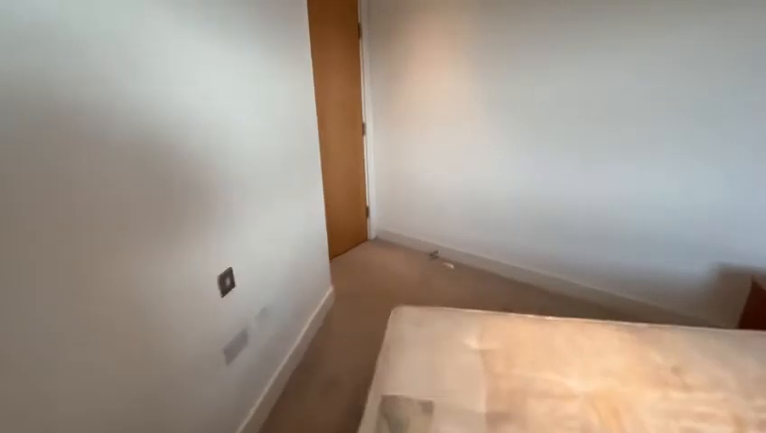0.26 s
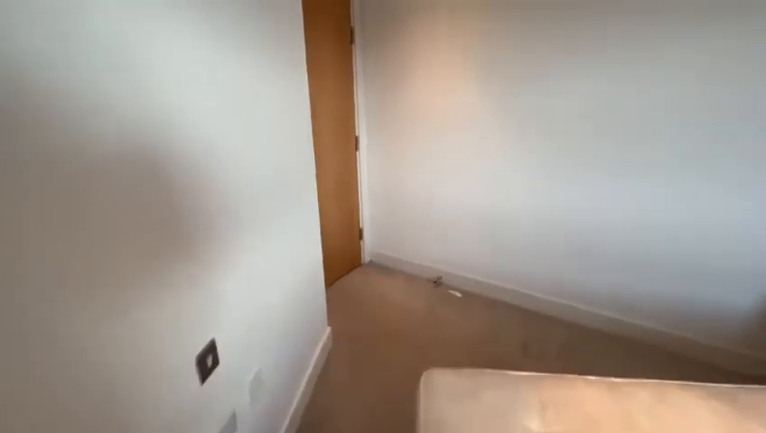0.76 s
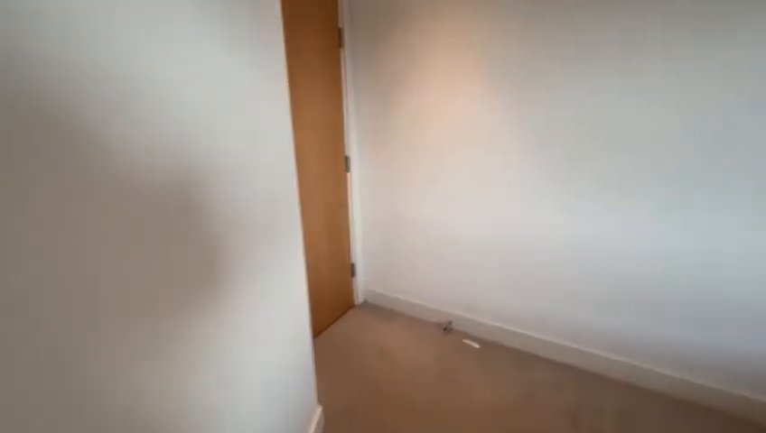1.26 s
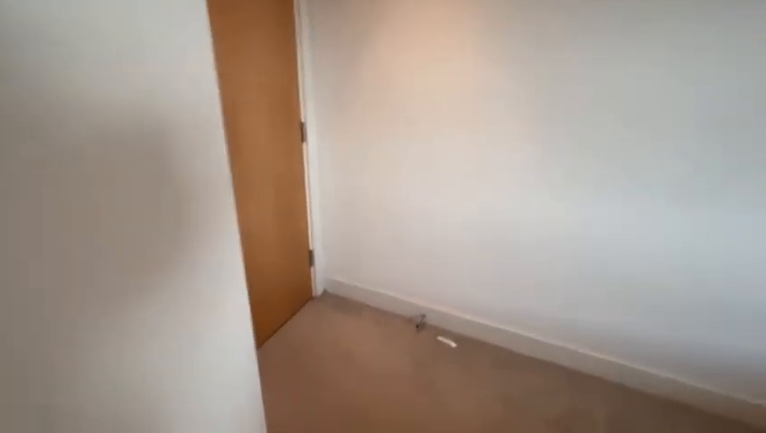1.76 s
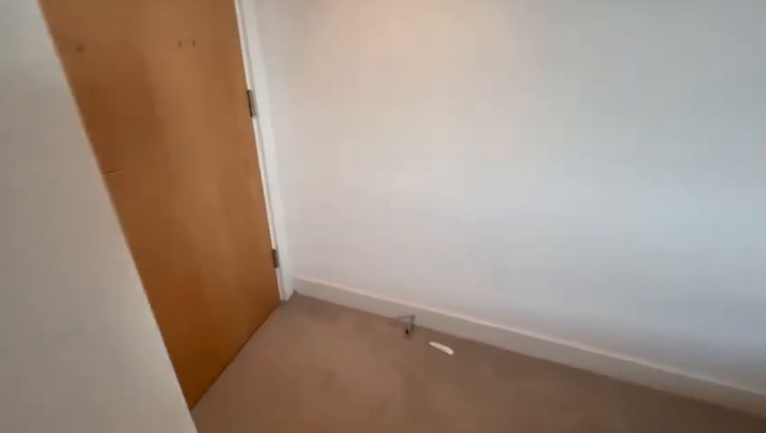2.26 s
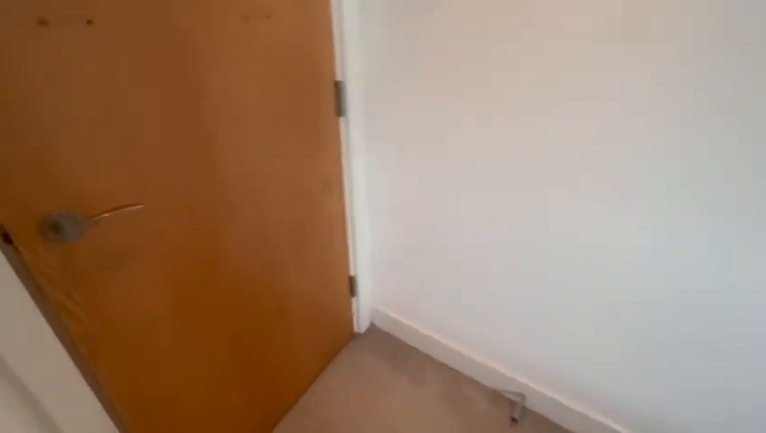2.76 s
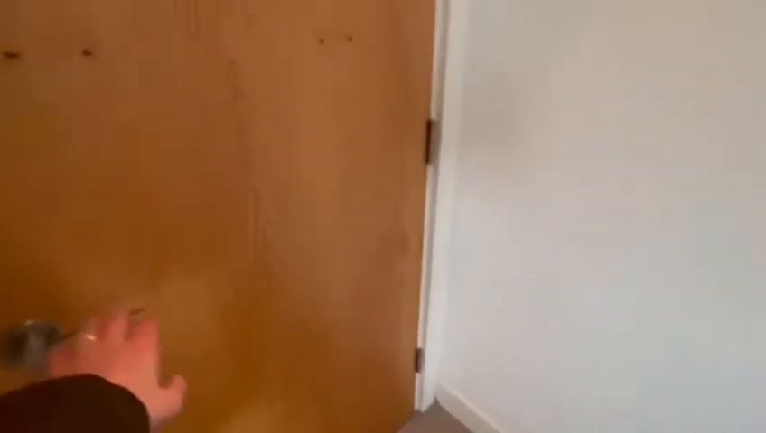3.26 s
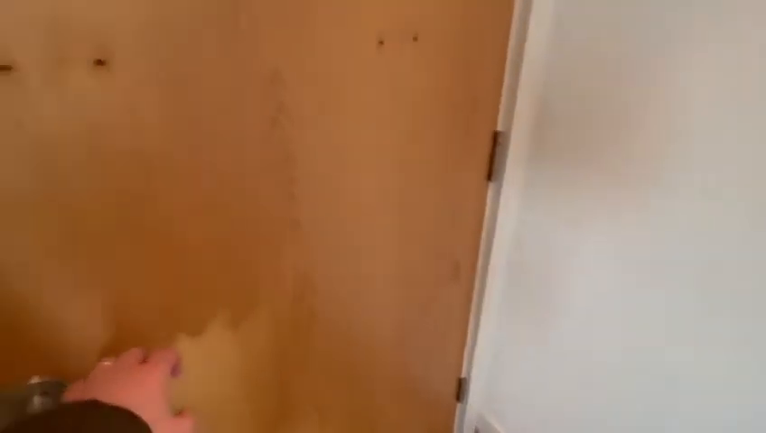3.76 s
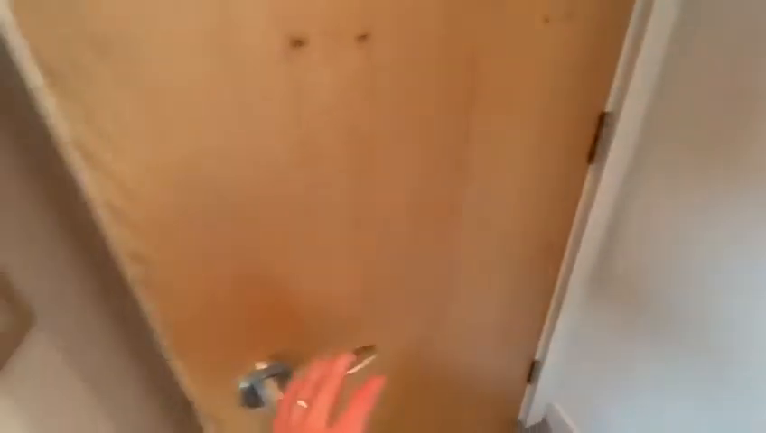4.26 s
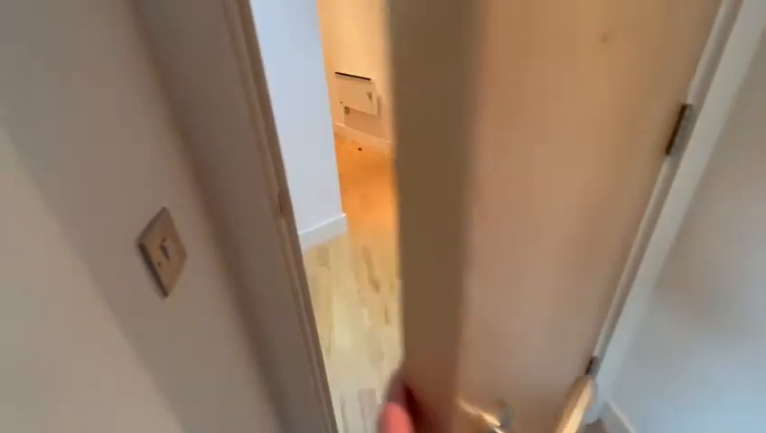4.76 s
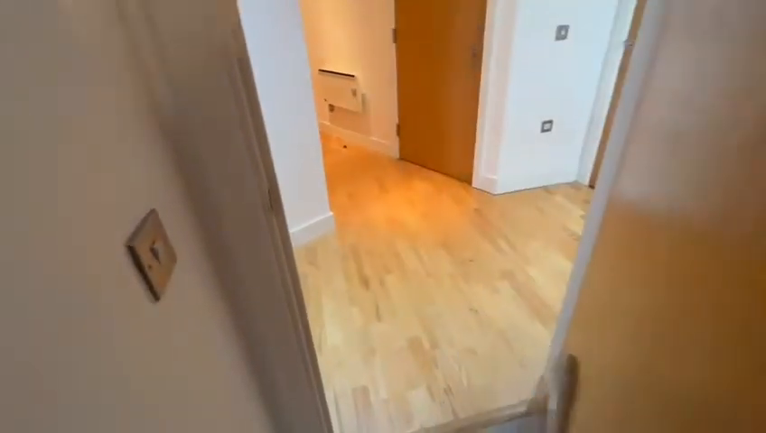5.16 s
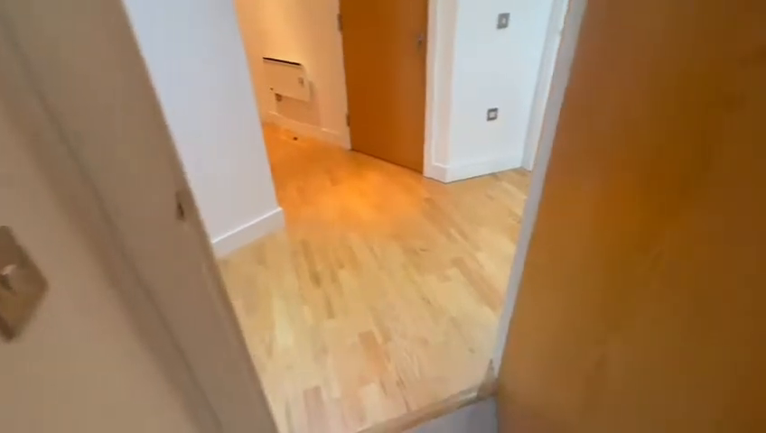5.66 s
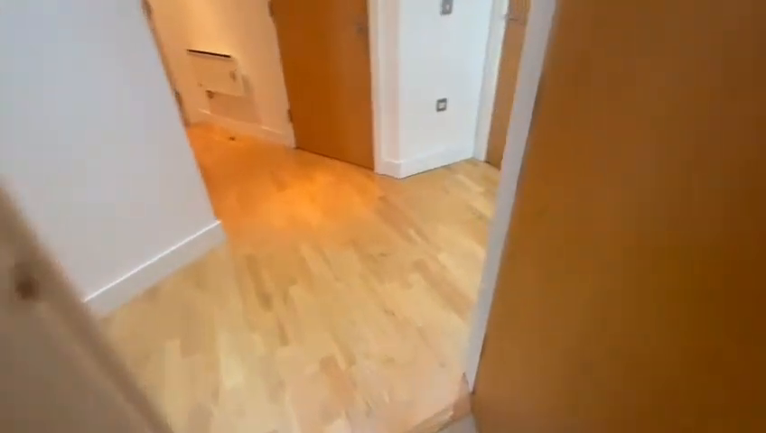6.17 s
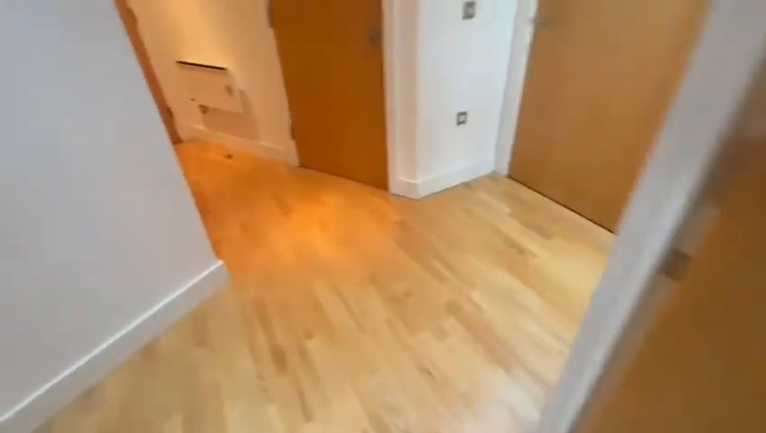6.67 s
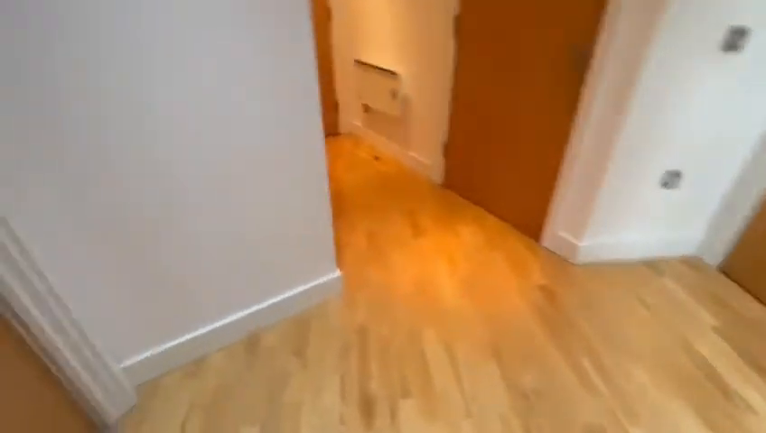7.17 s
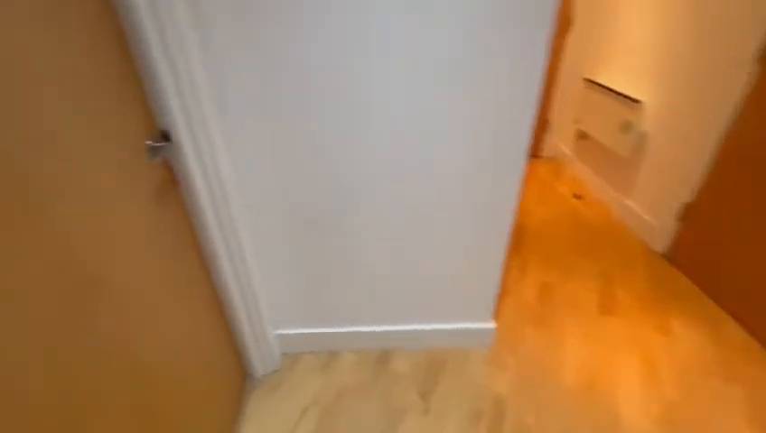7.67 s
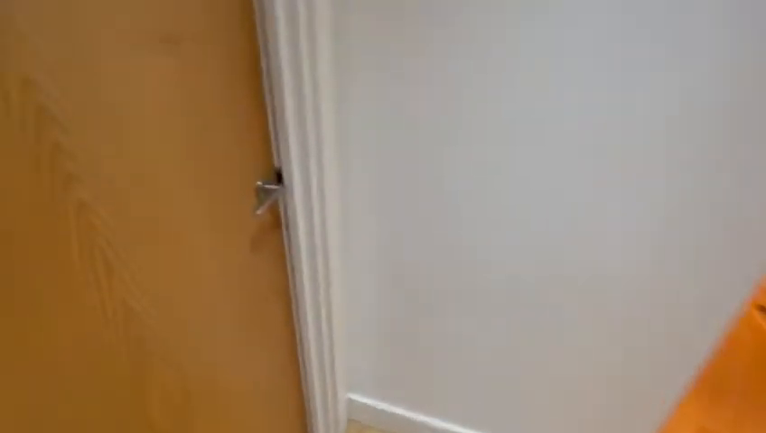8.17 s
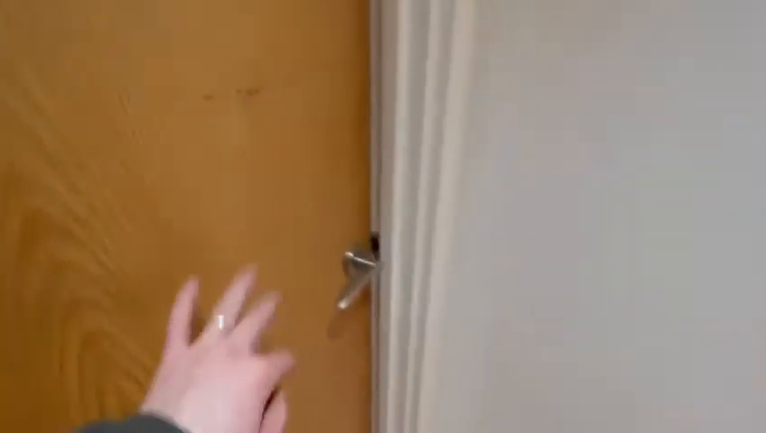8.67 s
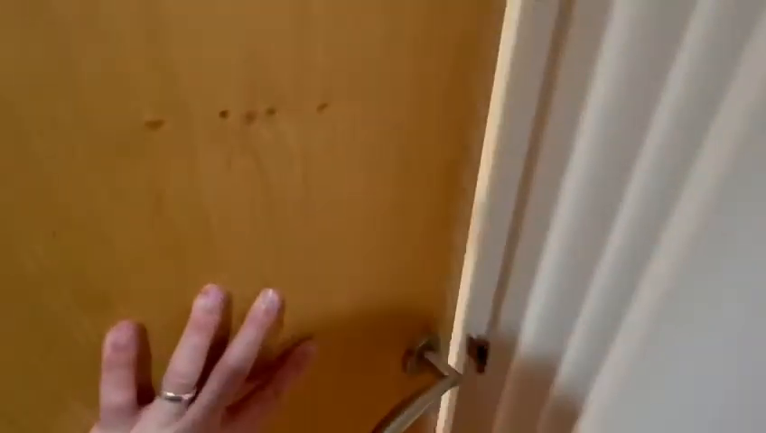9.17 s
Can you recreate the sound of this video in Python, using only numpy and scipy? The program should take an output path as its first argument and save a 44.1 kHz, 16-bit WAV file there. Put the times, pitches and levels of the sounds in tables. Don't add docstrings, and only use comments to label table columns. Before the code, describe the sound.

Close mono handheld phone sound: cloth rubbing, fingertip taps and grip rumble throughout. A crisp scuff on a bedroom carpet edge is followed by small metallic ticks, a sleeve swish and faint handle clicks. After a soft tug and rustling, a hollow door thump bounces against its stop. In the barer, livelier hall, shoes scrape in two drags, then a palm pats wood and a lever and latch snap open.

```python
import sys
import numpy as np
from scipy import signal
from scipy.fft import rfft, irfft, next_fast_len
from scipy.io import wavfile
from scipy.ndimage import uniform_filter1d, map_coordinates

SR = 44100
rng = np.random.default_rng(int(sys.argv[2]) if len(sys.argv) > 2 else 0)


def boost(x):
    u = np.asarray(x, float) / 20
    return 10 ** u


def bounce(signal):
    frames = np.transpose(np.atleast_2d(signal))
    limited = np.clip(frames, -1, 1)
    pcm = np.round(limited * 32767).astype(np.int16)
    wavfile.write(sys.argv[1], SR, pcm)


N = 415422

# time in seconds, level in dB.
SCUFF_PRESSURE = [
    [(1.0, -67), (1.022, -44), (1.044, -31), (1.053, -35), (1.058, -25.5), (1.085, -29.5), (1.14, -58)],
    [(7.1, -57), (7.148, -48.5), (7.186, -40), (7.2, -34), (7.25, -31), (7.262, -26.5), (7.35, -27),
     (7.44, -32), (7.5, -54)],
    [(7.895, -67), (7.913, -41), (7.933, -34), (8.07, -34), (8.09, -29.5), (8.115, -32), (8.285, -33),
     (8.3, -37), (8.345, -33), (8.41, -55)],
]
# frequency in Hz, level in dB per Hz.
SOLE_SPECTRA = [
    [(260, -33), (450, -7.5), (2110, -6), (2420, -13), (4760, -3.5), (9100, -18), (12200, -47),
     (15800, -72), (22000, -120)],
    [(240, -32), (400, -25), (500, -5.5), (679, -5.5), (1000, -5.5), (1600, -3), (2100, -11.5),
     (2280, -11.5), (5460, -15), (9130, -28.5), (12200, -29), (15800, -68), (22000, -120)],
    [(240, -20), (400, -25), (560, -13), (800, -4), (1400, -12), (1650, -9), (2100, -12.5), (3660, -12),
     (8870, -31), (11300, -35.5), (12200, -39), (15800, -75), (22000, -120)],
]
# level against the drag in dB, loading time in seconds.
FLOOR_DRUMMING = [(-7.5, 0.039), (-7, 0.076), (-7.5, 0.056)]
UNLOADED_DB = -16
SOLE_ECHO_DB = [-3, -3.5, -5]
# frequency in Hz, width in Hz, level in dB.
BOARD_MODES = [(145, 35, -13.5), (281.4, 72, 6.5), (321, 108, 4.5), (403, 48, 4.5), (550, 34, -6.5)]
# peak, rise and fall in seconds, level in dB, centre in Hz.
SOLE_TWISTS = [(7.39, .1, 0.1, -33, 1540), (7.4, 0.075, 0.053, -38, 625), (7.97, 0.02, 0.06, -41, 3970),
               (8.26, .09, 0.04, -38, 3500), (8.28, .06, .04, -38.5, 1160), (8.34, 0.028, .025, -45, 3300)]
# peak, rise and fall in seconds, level in dB, centre in Hz.
CUFF_RUBS = [(.185, .04, .04, -53, 1100), (.2, 0.044, 0.038, -49, 4470), (.63, .012, .04, -53, 1100),
             (1.68, 0.054, 0.094, -57, 1480), (1.82, 0.044, .04, -54, 1600),
             (2.53, 0.017, 0.037, -49.5, 1300), (4.465, .025, 0.042, -55, 1500)]
TWIST_WIDTH, CUFF_WIDTH = 0.4, 0.86
# peak, rise and fall in seconds, level in dB, pitch in Hz.
DRAG_HUMS = [(7.225, .03, .03, -39, 1450), (7.27, .02, .03, -36, 500), (7.285, .03, .02, -34, 640),
             (7.32, .04, .03, -37, 1500), (7.33, .03, .03, -36, 1000), (7.375, .04, .05, -35, 1150),
             (7.42, 0.037, 0.037, -37, 1684), (7.44, .04, .04, -39, 600), (7.95, 0.035, .06, -40, 833),
             (7.95, 0.035, .08, -44, 660), (7.95, .03, .03, -42, 1670), (7.97, .03, .07, -41, 2360),
             (8.01, 0.037, 0.028, -37.5, 422), (8.043, .03, .01, -33.5, 300),
             (8.08, 0.064, 0.074, -37.5, 798), (8.09, 0.017, .025, -34.5, 360),
             (8.135, .025, .014, -33.5, 319), (8.14, .05, .05, -39, 620), (8.18, .02, .05, -39, 850),
             (8.2, 0.052, .05, -34, 300), (8.2, .05, .07, -40, 1576), (8.21, .04, 0.066, -41, 1060),
             (8.268, 0.017, 0.01, -34.5, 280), (8.31, .03, .04, -41, 1080), (8.33, .03, .025, -36, 330)]
HUM_STRAYS_HZ = 59
# time in seconds, peak in dB.
DOOR_KNOCKS = [
    (6.193, -20.5),
    (6.203, -17.5),
    (6.219, -18),
    (6.238, -23),
    (6.268, -29.5),
]
# frequency in Hz, level in dB, t60 in seconds.
DOOR_MODES = [(144.5, -1.5, 0.23), (161, 0.5, 0.51), (210, -1.5, 0.19), (264, -2, 0.14), (308, -3, .16),
              (343, 1.5, 0.12), (421, -3.5, 0.12), (522, 4, 0.14), (598, 0, 0.17), (702, -8, .12),
              (770, -10, .14)]
# time in seconds, peak in dB, centre in Hz, t60 in seconds.
TICKS = [(1.403, -48, 1860, .032), (1.556, -47.5, 3880, .05), (1.555, -38, 8500, 0.043),
         (2.251, -43, 874, 0.028), (2.726, -42, 2080, .02), (6.371, -35, 1634, 0.027),
         (6.393, -41, 1500, .03), (6.47, -37.5, 2600, 0.053), (6.486, -39, 1190, 0.03)]
# time in seconds, peak in dB, centre in Hz, t60 in seconds.
METAL_KNOCKS = [(.326, -36.5, 1090, .04), (0.618, -38, 1600, 0.06), (.199, -36, 1200, .015),
                (0.885, -32.5, 3500, .07), (3.701, -36, 1450, .05), (6.194, -24, 1250, .05),
                (0.967, -33.5, 1300, 0.022), (2.713, -47, 900, 0.014), (3.017, -38, 597, 0.027),
                (3.228, -31, 650, .02), (4.287, -38, 900, .04), (3.675, -38.5, 1470, 0.053),
                (8.886, -35, 1500, .03), (8.902, -29, 2500, 0.063), (8.906, -34, 1200, .04)]
# time in seconds, peak in dB, centre in Hz, t60 in seconds.
RASPS = [(0.198, -37, 1800, 0.06), (.32, -35.5, 1700, 0.04), (.333, -35.5, 2000, .02),
         (1.957, -36, 1200, 0.064), (7.191, -33, 3000, .05), (3.73, -41, 1700, 0.076),
         (7.255, -21.5, 2150, 0.056), (8.8, -23.5, 3000, 0.043), (8.813, -29, 3370, 0.14),
         (9.04, -24, 2950, 0.051)]
# time in seconds, peak in dB, centre in Hz, t60 in seconds.
HEELS = [(7.15, -34, 1500, .063), (7.16, -30.5, 9000, .05), (7.916, -33.5, 3000, 0.099)]
# time in seconds, peak in dB, centre in Hz, t60 in seconds.
SNAPS = [(1.044, -21, 7000, 0.022), (1.054, -18.5, 2640, 0.058), (4.273, -38, 990, 0.023),
         (6.204, -28, 950, .09), (8.081, -23, 4400, 0.03), (8.091, -20, 4170, 0.053),
         (9.04, -34, 9530, 0.012), (9.044, -23.5, 1460, 0.13)]
# width as a share of the centre, echo in dB.
CONTACT_KINDS = [
    (0.32, -8.5),
    (0.78, -1),
    (1.62, -1.5),
    (7.6, 18),
    (1.1, -3.5),
]
# (frequency in Hz, level in dB).
RINGING_PARTS = [
    ((.885, -40.5, 0.07), [(1335, -4), (1852, 1), (2433, -2), (3219, -6), (4048, -1), (4350, 0), (5066, -2), (5636, -3)]),
    ((4.273, -42, .07), [(430, -5), (790, 0), (880, 1), (1120, 0), (1480, -8)]),
    ((6.194, -37, .16), [(845, -2), (931, -4), (1055, 0), (1222, 0), (1303, -3), (1534, -1), (1922, -15), (2272, -13)]),
    ((6.469, -41.5, 0.062), [(1730, -8), (2280, -8), (2531, 0), (2811, 0)]),
    ((8.783, -34, 0.073), [(280, -3), (371, 3.5), (528, -6.5)]),
    ((8.906, -27.5, 0.077), [(371, 3.5), (528, -4.5), (1297, -20), (2164, -19), (2778, -12), (3408, -15)]),
    ((9.041, -35.5, 0.089), [(754, 1.5), (1114, 0), (1287, 5), (1954, -4), (2885, -1), (3892, -5), (4300, -6), (4640, -8), (5529, -12), (6300, -11)]),
]
# time in seconds, peak in dB, pitch in Hz, t60 in seconds, panel level in dB.
SOFT_BLOWS = [(1.019, -37, 68, 0.071, -12), (1.322, -43, 203, 0.094, -9), (1.351, -43, 83.8, 0.077, -1.5),
              (1.899, -45.5, 132, 0.037, 0), (2.215, -49.5, 252, 0.3, 2.5), (2.603, -41.5, 259, 0.082, 4),
              (2.918, -61, 214, 0.053, 5), (3.393, -35.5, 564, 0.038, -4.5), (3.81, -43, 62, 0.091, 0),
              (3.85, -52, 400, .2, 6.5), (4.053, -50.5, 496, 0.097, 7), (4.27, -45, 325, 0.055, -1),
              (7.148, -40, 215, 0.061, 3), (7.203, -37, 403, 0.058, 2), (7.262, -31.5, 583, .12, -3.5),
              (8.783, -40, 300, 0.096, -1), (8.845, -46, 353, .08, 6), (8.904, -35, 299, 0.11, 3),
              (9.079, -37, 90.4, 0.047, 0), (9.249, -33, 59.4, 0.1, -19.5)]
# frequency in Hz, width in Hz, level in dB.
PANEL_MODES = [(140, 93, 13.5), (198, 17, -16), (248, 29, 3), (342, 140, 14.5), (570, 110, -9),
               (706, 72, -3)]
# peak, rise and fall in seconds, level in dB.
LEAF_PULLS = [
    (3.725, 0.057, 0.04, -45.5),
    (3.86, 0.058, 0.072, -36),
    (3.99, .09, 0.076, -35.5),
    (4.15, 0.03, 0.024, -41),
    (4.216, 0.026, 0.026, -39),
]
LEAF_HZ = 49
# peak, rise and fall in seconds, level in dB, resonance in Hz.
SLEEVE_FOLDS = [
    (3.105, 0.023, .03, -38.5, 1314),
    (3.145, 0.038, 0.042, -34, 1230),
    (3.19, .02, 0.026, -49, 1047),
    (3.36, 0.04, 0.037, -43.5, 900),
    (3.441, 0.087, 0.062, -46.5, 600),
]
FOLD_SAG_HZ_PER_S = 400
# peak, rise and fall in seconds, bright level in dB, dull
# over bright in dB.
RUSTLES = [(.25, 0.46, 0.87, -57, -3.5), (.87, 0.29, 0.63, -53, -3), (1.0, .07, 0.13, -43, -24),
           (1.35, 0.18, 0.057, -60, -1), (1.75, 0.3, 0.21, -61, -10.5),
           (1.97, 0.045, .1, -53.5, 1.5), (2.12, 0.34, 0.32, -51.5, -0.5),
           (2.52, 0.84, 0.19, -57, 0), (2.92, 0.87, .3, -61, -0.5), (3.23, 0.2, 0.24, -42.5, -2),
           (3.46, 0.24, 0.07, -56, -20), (3.71, 0.026, 0.085, -54, 5.5),
           (3.93, 0.19, 0.63, -63.5, 2.5), (4.134, 0.59, 0.2, -59.5, 2), (4.33, 0.036, 1, -59, 0.5),
           (4.66, 0.11, 0.16, -51.5, -5), (4.75, 0.1, 0.053, -51, 0), (4.9, 0.13, 0.29, -54, -6),
           (5.14, 0.33, 0.032, -55, -4), (5.6, 0.83, 0.57, -55.5, -3),
           (5.92, 0.075, 0.41, -50, -1.5), (6.17, 0.17, 0.27, -49.5, -5.5), (6.5, 0.27, 0.28, -56, 0),
                (6.83, 0.044, 0.067, -60, 2), (7.01, 0.087, 0.045, -58.5, -1.5),
                (7.12, 0.13, .6, -57.5, -17), (7.724, 0.41, 0.18, -52.5, -4), (8.62, 0.84, 1, -57.5, -2.5),
                (8.95, 0.24, 0.33, -54.5, 7)]
# peak in seconds, rise and fall in seconds, level in dB.
JACKET_SWINGS = [(.3, 0.32, -58), (.694, 0.16, -62.5), (1.0, .07, -54), (1.18, 0.074, -46.5),
                 (1.43, 0.15, -59.5), (2.09, 0.25, -55), (2.4, 0.23, -55.5), (2.65, 0.38, -62),
                 (3.01, 0.089, -59), (3.34, 0.13, -58), (3.52, 0.27, -50.5), (3.72, .06, -56),
                 (3.86, 0.12, -51.5), (4.134, 0.53, -53.5), (4.33, .2, -66), (4.8, 0.28, -57),
                 (5.332, 0.14, -53.5), (5.8, 0.2, -58.5), (6.17, 0.092, -54), (6.33, 0.14, -49.5),
                 (6.47, 0.1, -47.5), (6.83, 0.039, -58.5), (7.044, 0.11, -58.5), (7.724, 0.17, -59),
                 (8.5, 0.32, -59.5), (8.93, 0.11, -39.5), (9.299, 0.092, -45.5)]
STILL_FIZZ_DB, STILL_BRUSH_DB, STILL_BODY_DB = -89, -106, -80
# frequency in Hz, level in dB per Hz.
FIZZ_SPECTRUM = [(1060, 0), (1800, 0), (4850, -0.5), (5920, -0.5), (8410, -5), (11000, -11.5),
                 (11700, -9.5), (12200, -52), (15800, -61), (22000, -120)]
# frequency in Hz, level in dB per Hz.
BRUSH_SPECTRUM = [(290, -3), (500, -1.5), (572, -1.5), (700, -1), (1260, 0), (2500, -11.5), (3250, -46),
                  (5500, -120)]
# frequency in Hz, level in dB per Hz.
BODY_SPECTRUM = [(59, -4.5), (100, -0.5), (237, -2.5), (286, -7), (323, -4.5), (700, -19.5), (910, -21),
                 (1540, -120)]
# time in seconds, peak in dB.
FINGER_TAPS = [(0.204, -42), (1.619, -47.5), (1.722, -42.5), (1.997, -41), (2.681, -46), (3.051, -46),
               (3.919, -43), (5.002, -47), (5.111, -46.5), (5.135, -48), (5.155, -48), (6.455, -38),
               (6.486, -38), (6.59, -41), (6.808, -53), (7.821, -46)]
# time in seconds, peak in dB.
PALM_BUMPS = [(0.261, -44), (0.418, -48), (.463, -43.5), (0.704, -55), (1.314, -46), (1.681, -53),
              (1.774, -51), (1.804, -47), (1.893, -49), (1.935, -43), (2.252, -37), (2.639, -53),
              (2.658, -41.5), (2.756, -48), (2.922, -43), (3.092, -46), (3.255, -31), (3.834, -42),
              (4.047, -37), (4.191, -51), (4.507, -38.5), (5.308, -46), (5.48, -52), (5.75, -45.5),
              (6.894, -63)]
FINGER_HZ, PALM_HZ = 1400, 455
TAP_FALL_S, TAP_T60_S = 0.00656, 0.043
# peak in seconds, rise and fall in seconds, level in dB.
GRIP_JOLTS = [(.05, 0.059, -62.5), (.28, 0.13, -50.5), (.49, 0.071, -51.5), (.76, 0.28, -56.5),
              (1.07, 0.069, -36.5), (1.21, 0.049, -42.5), (1.38, 0.19, -53.5), (1.811, 0.045, -54),
              (1.96, 0.15, -49.5), (2.65, 0.18, -56), (3.2, 0.68, -58), (3.95, 0.6, -52),
              (4.09, 0.044, -42), (1.65, 0.12, -60), (6.601, 0.061, -51), (4.428, 0.12, -53.5),
              (4.83, .02, -41), (4.86, 0.045, -40), (5.01, 0.042, -50), (5.13, 0.25, -52),
              (5.56, 0.1, -44.5), (5.75, 0.21, -53), (6.3, 0.75, -54), (7.06, 0.086, -61),
              (7.24, 0.089, -47), (7.84, 0.062, -54.5), (8.2, 0.11, -52.5), (8.95, 0.091, -47),
              (9.1, 0.16, -40.5), (9.27, 0.066, -38), (9.41, 0.088, -50)]
STILL_GRIP_DB, GRIP_HZ, SAG_HZ_PER_DB = -70, 68, 0.1
GRIP_STRAYS_HZ = 25.4
SWELL_DB = 12
# frequency in Hz, t60 in seconds.
HALL_T60 = [(150, 0.42), (1000, 0.6), (4000, 0.65), (11000, 0.31)]
HALL_FROM_S = 6.0
# release in seconds, fade in seconds, depth in dB.
LULL_DUCKS = [(1.55, 0.11, 0.5), (3.674, 0.16, 6.5), (3.8, 0.046, 6), (4.27, 0.081, 2.5), (5.698, 0.53, 6),
              (6.79, .1, -0.5), (6.98, 0.24, 3), (7.9, 0.098, 0.5), (8.78, 0.12, 6)]
DUCK_RELEASE_S = 0.0068
# frequency in Hz, threshold in deviations.
MUTE_THRESHOLDS = [(2500, -2.9), (6000, -2.0), (9000, -1.3), (10500, -.7), (11700, -.2)]
TOP_HZ = 12200


def unit(x):
    return x / np.sqrt(np.mean(x ** 2) + 1e-20)


def along(points, hz):
    f, v = np.transpose(points)
    return np.interp(np.log(hz + 1), np.log(f + 1), v)


def wobble(rate_hz, order=3):
    knots = rng.standard_normal(int(N * rate_hz / SR) + 4)
    return map_coordinates(knots, [np.arange(N) * rate_hz / SR], order=order)


def swells(peak_s, rise_s, fall_s, db, still_db):
    t = np.arange(0, N / SR, .002)[:, None]
    away = np.maximum((peak_s - t) / rise_s, (t - peak_s) / fall_s)
    power = np.sum(boost(db - SWELL_DB * away) ** 2, axis=1) + boost(still_db) ** 2
    return np.interp(np.arange(N) / SR, t[:, 0], 10 * np.log10(power))


def filtered(x, response):
    m = next_fast_len(len(x) + 8192)
    return irfft(rfft(x, m) * response(np.fft.rfftfreq(m, 1 / SR)), m)[:len(x)]


def modes(table):
    def response(f):
        return sum((-1) ** k * boost(db) * 1j * f * width / (centre ** 2 - f ** 2 + 1j * f * width)
                   for k, (centre, width, db) in enumerate(table))
    return response


def straying(pitch_hz, width_hz):
    real, imag = [unit(filtered(rng.standard_normal(N), lambda hz: 1 / (1 + 1j * hz / width_hz) ** 2))
                  for _ in range(2)]
    return (real + 1j * imag) * np.exp(2j * np.pi * np.cumsum(pitch_hz) / SR)


def steadied(z):
    return z / (np.abs(z) + .3) ** .7 * 1.4


def grit(grain_db, patchy_db):
    catches = rng.standard_normal(N) * boost(grain_db * wobble(1500, order=1))
    z = signal.stft(catches, nperseg=512)[2]
    field = uniform_filter1d(uniform_filter1d(rng.standard_normal(z.shape), 8, 0), 7, 1)
    return signal.istft(z * boost(patchy_db * unit(field)), nperseg=512)[1][:N]


def rub(spectrum, grain_db, patchy_db):
    return unit(filtered(grit(grain_db, patchy_db), lambda hz: boost(along(spectrum, hz))))


def tail(s):
    hz, t, z = signal.stft(rng.standard_normal(SR // 2), SR, nperseg=256)
    stretch = .7 if s < HALL_FROM_S else 1
    fade = boost(-60 * t / (stretch * along(HALL_T60, hz)[:, None]))
    x = signal.istft(z * fade, SR, nperseg=256)[1][:SR // 2]
    return x / np.linalg.norm(x)


def scuffs():
    out, catches = np.zeros(N + SR), grit(grain_db=2.0, patchy_db=1.5)
    floor = lambda hz: modes(BOARD_MODES)(hz) / (1 + (120 / (hz + 1)) ** 4)
    drum = unit(filtered(grit(grain_db=4.0, patchy_db=2.0), floor))
    judder_db = 1.1 * wobble(90, order=1)
    soles = zip(SCUFF_PRESSURE, SOLE_SPECTRA, FLOOR_DRUMMING, SOLE_ECHO_DB)
    for rows, spectrum, (drum_db, load_s), echo_db in soles:
        s, db = np.transpose(rows)
        span = slice(round(s[0] * SR), round(s[-1] * SR))
        drag_db = np.interp(np.arange(N) / SR, s, db)[span]
        board_db = drum_db + UNLOADED_DB * np.exp(-np.arange(len(drag_db)) / SR / load_s)
        scrape = unit(filtered(catches[span], lambda hz: boost(along(spectrum, hz))))
        direct = boost(drag_db - 3.0 + judder_db[span]) * (scrape + boost(board_db) * drum[span])
        wet = boost(echo_db) * signal.fftconvolve(direct, tail(s[0]))
        out[span] += direct
        out[span.start:][:len(wet)] += wet
    return out[:N]


def twists():
    out, catches = np.zeros(N), grit(grain_db=2.0, patchy_db=1.5)
    rubs = [(*row, TWIST_WIDTH) for row in SOLE_TWISTS] + [(*row, CUFF_WIDTH) for row in CUFF_RUBS]
    for s, rise, fall, db, hz, share in rubs:
        span = slice(max(0, round((s - .4) * SR)), round((s + .4) * SR))
        band = modes([(hz, hz * share, 0)])
        level = boost(swells(s, rise, fall, db, still_db=-140)[span])
        out[span] += level * unit(filtered(catches[span], lambda f: band(f) ** 2))
    return out


def hums():
    out, drift = np.zeros(N), steadied(straying(np.zeros(N), HUM_STRAYS_HZ))
    for k, (s, rise, fall, db, hz) in enumerate(DRAG_HUMS):
        i = np.arange(round((s - .3) * SR), round((s + .3) * SR))
        away = np.maximum((s - i / SR) / rise, (i / SR - s) / fall)
        note = (drift[i - k * 9000] * np.exp(2j * np.pi * hz * i / SR)).real
        out[i] += boost(db - SWELL_DB * away ** 1.5) * note
    return out


def door():
    out, t = np.zeros(SR), np.arange(SR // 2) / SR
    first_s = DOOR_KNOCKS[0][0]
    for s, db in DOOR_KNOCKS:
        ring = sum(boost(level + rng.normal(0, 2) - 60 * t / t60) * np.sin(2 * np.pi * hz * t)
                   for hz, level, t60 in DOOR_MODES)
        out[round((s - first_s) * SR):][:len(t)] += boost(db - 15.5) * ring * (1 - np.exp(-t / 0.0017))
    out = out + boost(-8.5) * signal.fftconvolve(out, tail(first_s))[:SR]
    return np.pad(out, (round(first_s * SR), N))[:N]


def clicks():
    out, t = np.zeros(N + SR), np.arange(SR // 2) / SR
    tables = (TICKS, METAL_KNOCKS, RASPS, HEELS, SNAPS)
    contacts = [(*row, *kind) for rows, kind in zip(tables, CONTACT_KINDS) for row in rows]
    for s, db, centre_hz, t60, share, echo_db in sorted(contacts):
        fade = boost(-60 * t / t60) + 1.24 * boost(-60 * t / 0.0024)
        rattle = rng.standard_normal(len(t)) * fade
        walls = boost(echo_db) * np.linalg.norm(rattle) * tail(s) * (1 - np.exp(-t / 0.0043))
        band = modes([(centre_hz, centre_hz * np.clip(share, .1, 6), 0)])
        both = filtered(rattle + walls, lambda hz: (band(hz) * hz / (hz - .1j * centre_hz)) ** 2)
        out[round(s * SR):][:len(t)] += boost(db) * both / np.abs(both).max()
    return out[:N]


def rings():
    out, t = np.zeros(N + 2 * SR), np.arange(SR // 4) / SR
    for (s, db, t60), table in RINGING_PARTS:
        ring = sum(boost(db + level - 60 * t / t60) * np.sin(2 * np.pi * hz * t) for hz, level in table)
        ring = ring * (1 - np.exp(-t / 0.0006))
        both = boost(-7.0) * signal.fftconvolve(ring, tail(s))
        both[:len(t)] += ring
        out[round(s * SR):][:len(both)] += both
    return out[:N]


def thuds():
    out, t = np.zeros(N + 2 * SR), np.arange(SR // 3) / SR
    for s, db, hz, t60, panel_db in SOFT_BLOWS:
        fade = boost(-60 * t / t60) * (1 - np.exp(-t / 0.0019))
        push = fade * np.sin(2 * np.pi * hz * (t + 0.001 * (1 - np.exp(-t / 0.00068))))
        shake = filtered(fade * rng.standard_normal(len(t)), modes(PANEL_MODES))
        blow = push / push.max() + boost(panel_db) * shake / np.abs(shake).max()
        both = boost(-12) * signal.fftconvolve(blow, tail(s))
        both[:len(t)] += blow
        out[round(s * SR):][:len(both)] += boost(db + 1.5) * both
    return out[:N]


def leaf():
    level_db = swells(*np.transpose(LEAF_PULLS), still_db=-140) + 5.5
    return boost(level_db) * np.sin(2 * np.pi * np.cumsum(LEAF_HZ + 1.52 * wobble(10)) / SR)


def sleeve():
    out, rustle = np.zeros(N), steadied(straying(np.zeros(N), width_hz=107))
    t = np.arange(N) / SR
    for s, rise, fall, db, hz in SLEEVE_FOLDS:
        turn = np.exp(2j * np.pi * np.cumsum(hz - FOLD_SAG_HZ_PER_S * (t - s)) / SR)
        out += boost(swells(s, rise, fall, db, still_db=-140)) * (rustle * turn).real
    return out


def pops():
    out, t = np.zeros(N + SR), np.arange(SR // 12) / SR
    taps = [(*row, FINGER_HZ) for row in FINGER_TAPS] + [(*row, PALM_HZ) for row in PALM_BUMPS]
    for s, db, first_hz in taps:
        click_cycles = first_hz * TAP_FALL_S / 3 * (1 - np.exp(-3 * t / TAP_FALL_S))
        bump_cycles = 260 * TAP_FALL_S * (1 - np.exp(-t / TAP_FALL_S)) + 62 * t
        fade = boost(db + 1.5 - 60 * t / TAP_T60_S) * (1 - np.exp(-t / 0.0013))
        out[round(s * SR):][:len(t)] += fade * np.sin(2 * np.pi * (click_cycles + bump_cycles))
    return out[:N]


def clothes():
    s, rise, fall, db, dull_db = np.transpose(RUSTLES)
    fizz_db = swells(s, rise, fall, db, STILL_FIZZ_DB)
    brush_db = swells(s, rise, fall, db + dull_db, STILL_BRUSH_DB)
    s, width, db = np.transpose(JACKET_SWINGS)
    body_db = swells(s, width, width, db, STILL_BODY_DB)
    flutter = wobble(18)
    fizz = boost(fizz_db + 2.0 * flutter) * rub(FIZZ_SPECTRUM, grain_db=-1.0, patchy_db=1.4)
    brush = boost(brush_db + .6 * flutter) * rub(BRUSH_SPECTRUM, grain_db=2.5, patchy_db=.6)
    body_db = body_db + 1.9 * flutter + 2.4 * wobble(30)
    body = boost(body_db) * rub(BODY_SPECTRUM, grain_db=4.0, patchy_db=-0.1)
    return fizz + brush + body


def hand():
    s, width, db = np.transpose(GRIP_JOLTS)
    level_db = swells(s, width, width, db, STILL_GRIP_DB)
    pitch_hz = GRIP_HZ - SAG_HZ_PER_DB * (level_db - STILL_GRIP_DB)
    swing = straying(.83 * pitch_hz, GRIP_STRAYS_HZ)
    steady = swing.real / (np.abs(swing) + .3) ** .75
    return boost(level_db) * unit(steady)


def ducking():
    t = np.arange(N) / SR
    depth_db = sum(db * np.interp(t, [s - fade, s - DUCK_RELEASE_S, s], [0, 1, 0])
                   for s, fade, db in LULL_DUCKS)
    return boost(-depth_db)


def muted(x):
    hz, _, z = signal.stft(x, SR, nperseg=1024)
    field = unit(uniform_filter1d(uniform_filter1d(rng.standard_normal(z.shape), 5, 0), 3, 1))
    keep = 1 / (1 + np.exp(-30 * (field - along(MUTE_THRESHOLDS, hz)[:, None])))
    return signal.istft(z * keep, SR, nperseg=1024)[1][:N]


def scene():
    feet = scuffs() + twists() + hums()
    doors = door() + clicks() + rings() + thuds() + leaf()
    near = sleeve() + pops()
    background = ducking() * (clothes() + hand())
    mono = feet + doors + near + background
    return np.array([mono, mono])


def low_pass(x):
    return signal.sosfilt(signal.butter(12, 12300, fs=SR, output="sos"), x)


def record(dry):
    colour = lambda hz: (hz < TOP_HZ) / (1 + (42 / (hz + 1)) ** 7) / (1 + (hz / 11700) ** 30)
    mono = muted(filtered(dry[0], colour))
    return low_pass(np.array([mono, mono]))


dry = scene()
out = record(dry)
bounce(out)
```